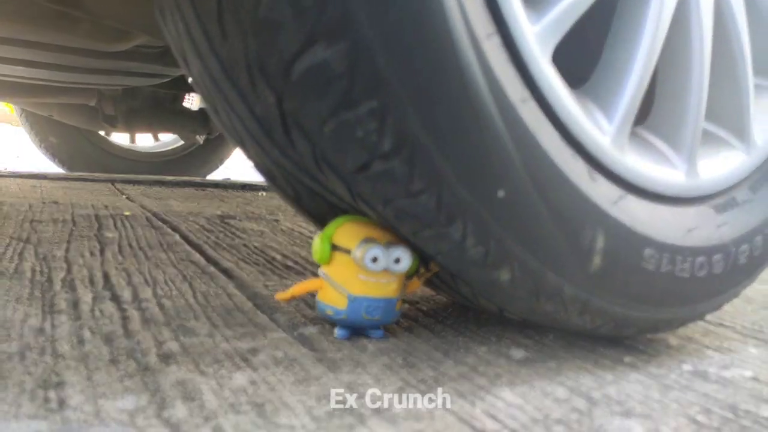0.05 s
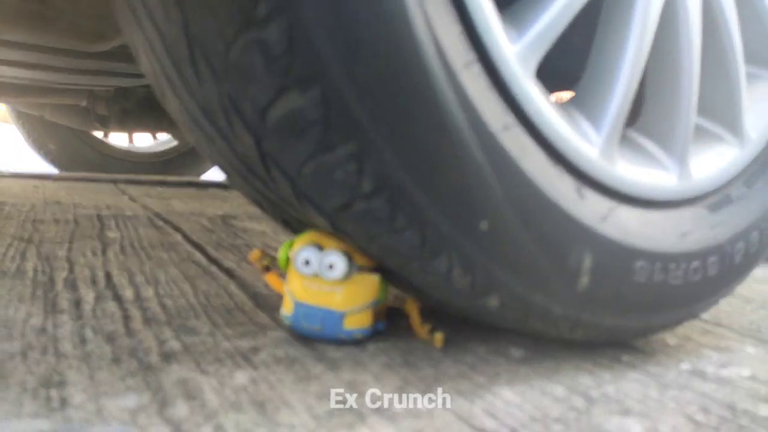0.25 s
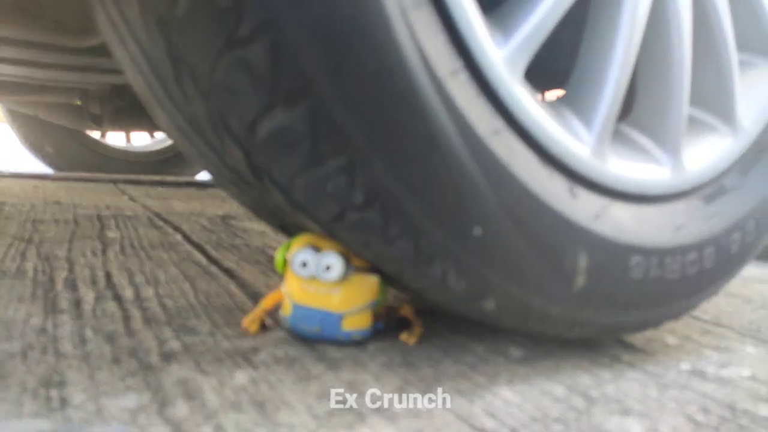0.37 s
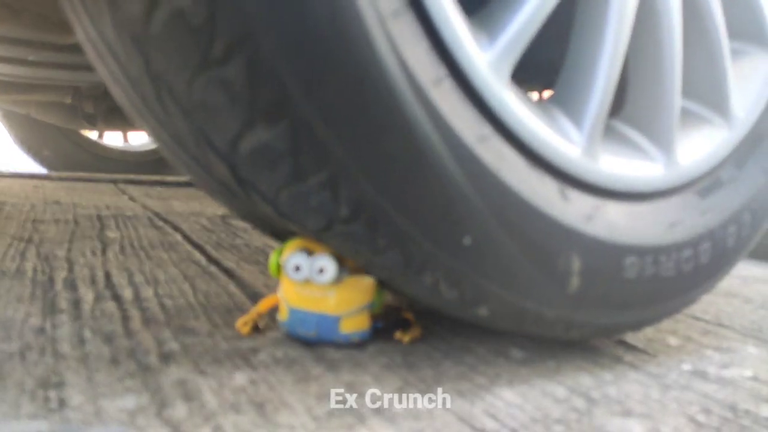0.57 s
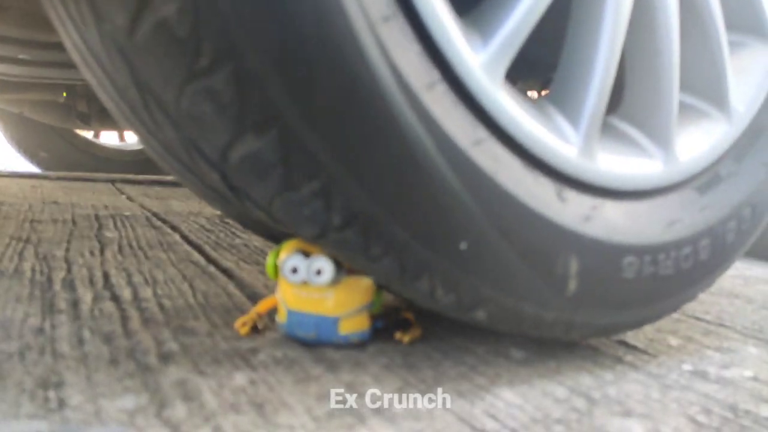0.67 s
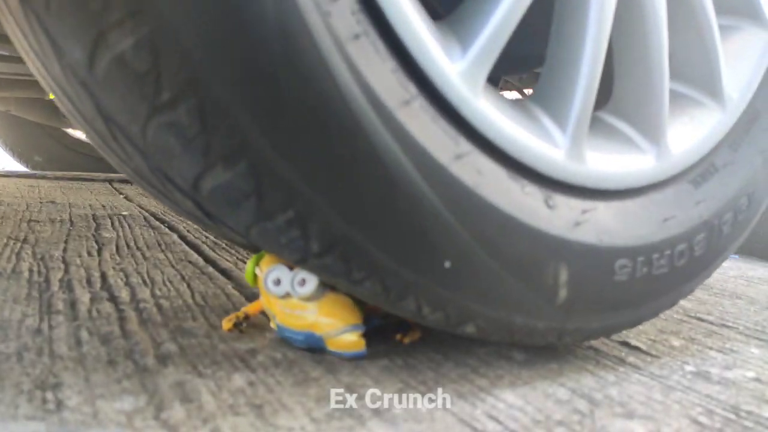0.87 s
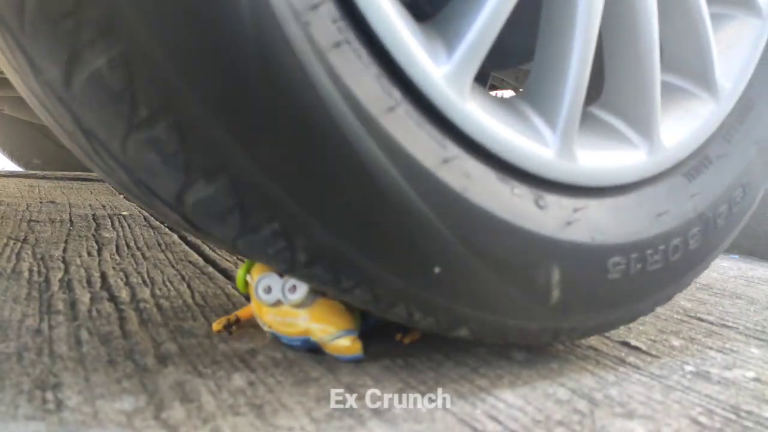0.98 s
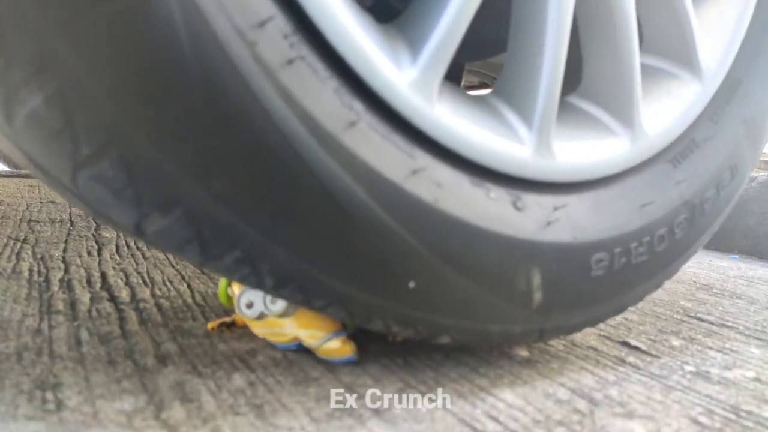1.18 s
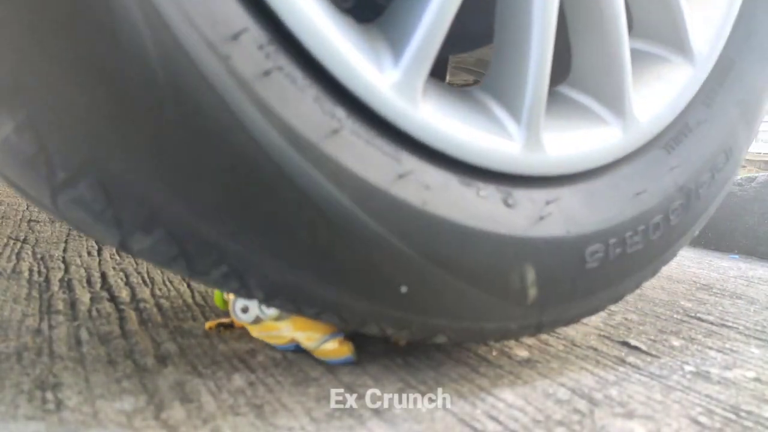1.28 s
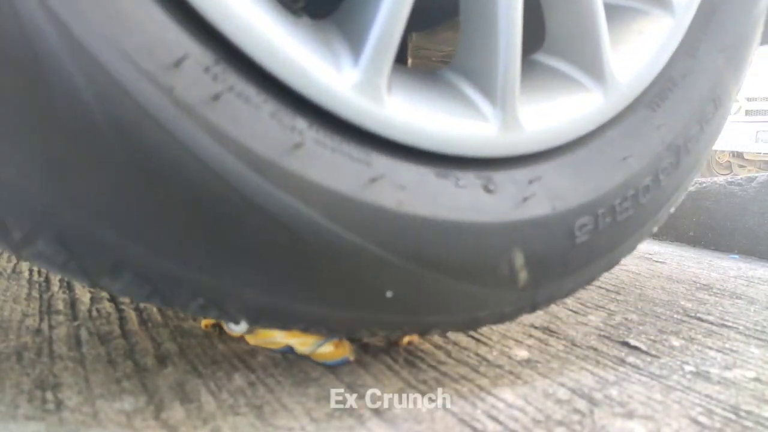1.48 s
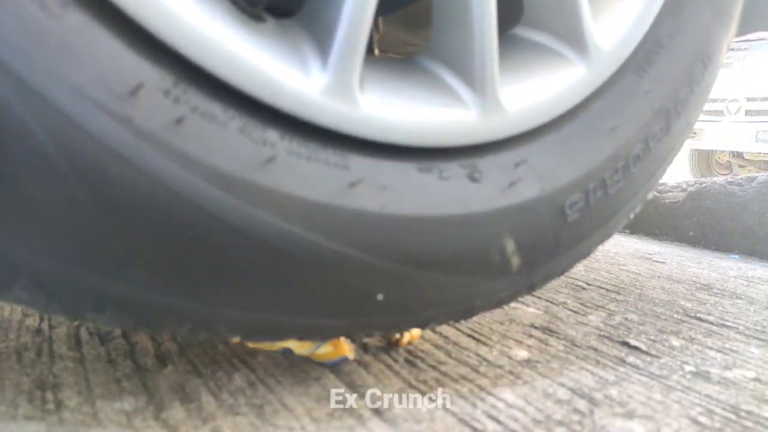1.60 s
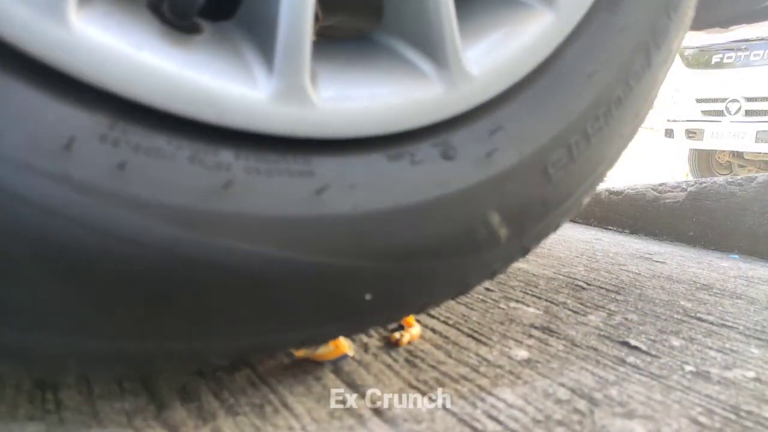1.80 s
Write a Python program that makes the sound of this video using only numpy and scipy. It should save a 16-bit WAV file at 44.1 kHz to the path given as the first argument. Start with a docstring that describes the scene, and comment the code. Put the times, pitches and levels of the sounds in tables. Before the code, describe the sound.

Hard plastic cracks and crunches in sharp snaps under a slowly rolling car tyre.

```python
"""On concrete, a hand's width from a phone, a car creeps over a hollow plastic toy.
The engine hums, a thin whine swells into one squeak, and grit crackles under the tyre.
The toy splits in sharp snaps: each cracks, rings a shard, knocks the shell and echoes under the car.
Each time the toy gives way, the tyre drops, booms and pushes air at the microphone, which overloads.
After the first drop the rubber settles with a dull rustle."""
import sys
import numpy as np
from scipy import signal
from scipy.fft import rfft, irfft
from scipy.io import wavfile
from scipy.ndimage import uniform_filter1d

SR = 44100
rng = np.random.default_rng(int(sys.argv[2]) if len(sys.argv) > 2 else 0)


def digitize_waveform(pressure):
    """Quantize a signal to 16-bit integers and store it at the path in sys.argv[1].

    Rows of a 2-D input are taken as channels; values are limited to [-1, 1].
    """
    field = np.atleast_2d(pressure).T
    bounded = np.clip(field, -1, 1)
    quanta = np.round(bounded * 32767).astype(np.int16)
    wavfile.write(sys.argv[1], SR, quanta)


N = 81585
TIME_S = np.arange(N) / SR


def gain(db):
    """Turn decibels into a number to multiply a sound by."""
    return 10 ** (np.asarray(db) / 20)


def fade(fade_s):
    """A smooth dying away that falls by 60 dB in fade_s seconds."""
    return np.exp(-np.log(1000) * TIME_S / fade_s)


def noise(colour):
    """Noise of strength 1, its lows and highs shaped by rows of (pitch_hz, level_db)."""
    hz, db = np.array(colour, float).T
    all_hz = np.maximum(np.fft.rfftfreq(N, 1 / SR), 1)
    roll_off = np.minimum(all_hz / hz[0], 1) ** 2 * np.minimum(hz[-1] / all_hz, 1) ** 2
    shape = gain(np.interp(np.log(all_hz), np.log(hz), db))
    sound = irfft(rfft(rng.standard_normal(N)) * roll_off * shape, N)
    return sound / sound.std()


def ring(tones):
    """A struck object: one fading tone for each row of (pitch_hz, level_db, fade_s)."""
    return sum(gain(db) * np.sin(2 * np.pi * hz * TIME_S) * fade(fade_s) for hz, db, fade_s in tones)


def add(out, start_s, sound):
    """Mix a sound into out at its start time."""
    start = max(int(start_s * SR), 0)
    out[start:start + len(sound)] += sound[:N - start]


def wander(turns_per_s):
    """A slow random drift around zero, roughly 1 in size."""
    step = int(SR / turns_per_s)
    targets = rng.standard_normal(N // step + 1)
    return uniform_filter1d(np.repeat(targets, step), step)[:N]


def lowpass(sound, hz):
    """Cut away the treble above hz."""
    return signal.sosfilt(signal.ellip(10, .2, 75, hz, fs=SR, output="sos"), sound)


# The tones in the engine's hum: pitch_hz, level_db
ENGINE_TONES = [(33, -50), (66.2, -21), (99.5, -48), (242, -38.5), (264, -40.5), (331, -40.5), (400, -47.5)]
# The lows and highs of the fan and street noise: pitch_hz, level_db
FAN_AND_STREET_COLOUR = [(90, -2), (170, 1), (340, -0.5), (460, -3), (750, -5), (1100, -8.5), (1600, -7.5),
                         (2500, -19.5), (4500, -21), (7500, -38), (9000, -34.5)]


def engine():
    """The engine's firing makes a slightly wavering hum, over fan and street noise and a low rumble."""
    wavering_s = TIME_S + 0.00017 * wander(3.3)
    hum = np.zeros(N)
    for hz, db in ENGINE_TONES:
        peak = gain(db - 0.5 * wander(10.1)) * np.sqrt(2)
        hum += peak * np.sin(2 * np.pi * (hz * wavering_s + rng.random()))
    rumble = gain(-25) * noise([(12, -0.5), (40, -19), (90, -21.5)])
    fan_and_street = gain(-34) * noise(FAN_AND_STREET_COLOUR) * gain(0.42 * wander(27))
    return hum + fan_and_street + rumble


def whine(pitch_hz=2005, squeak_middle_s=0.212, squeak_length_s=0.046):
    """A faint, thin whine from the car swells once into a short squeak."""
    phase = 2 * np.pi * np.cumsum(pitch_hz * (1 + 0.0021 * wander(15))) / SR
    tone = np.sin(phase) + gain(-12) * np.sin(2 * phase)
    swell = np.exp(-((TIME_S - squeak_middle_s) / (squeak_length_s / 2)) ** 6)
    return (gain(-53.5) + gain(-33.5) * swell) * tone


# The lows and highs of cracking plastic: pitch_hz, level_db
CRACK_COLOUR = [(100, -10), (400, 2.5), (900, 6.5), (1700, 4), (2400, 0), (4000, 0.5), (6000, -8),
                (7500, -7.5), (10000, -5)]


def crack_noise():
    """The bright noise of tearing plastic, from which clicks and cracks are cut."""
    return noise(CRACK_COLOUR)


# How loud the crackle under the tyre is as time passes: time_s, level_db
GRIT_LEVELS = [(0, -30), (.22, -78), (.31, -25), (.45, -36), (.72, -54), (0.952, -46), (1.2, -30.5),
               (1.5, -50), (1.85, -77)]


def grit(clicks_per_s=820, spread_db=7.5):
    """Strained plastic and grit make tiny random clicks under the tyre."""
    times_s, levels_db = np.array(GRIT_LEVELS).T
    clicks = (rng.random(N) < clicks_per_s / SR) * gain(spread_db * rng.standard_normal(N))
    crackle = signal.fftconvolve(clicks, crack_noise() * fade(0.0025))[:N]
    return crackle / crackle.std() * gain(np.interp(TIME_S, times_s, levels_db))


def shard(pitch_hz):
    """A broken piece rings briefly with one tone and a softer one just below it."""
    return ring([(pitch_hz, 0, 0.013), (pitch_hz / 1.05, -6, 0.013)])


# The tones of the toy's pinched shell when it is knocked: pitch_hz, level_db, fade_s
SHELL_TONES = [(502, -16.5, 0.035), (620, -5.5, 0.025), (764, -4, 0.032), (812, -4.5, 0.029),
               (1397, -18, .025)]
# One row for each snap of the toy; "first" and "second" are the two pitches of its shard:
# start_s, crack_db, crack_fade_s, knock_db, first_hz, first_db, second_hz, second_db
TOY_SNAPS = [ (0.1647, -11, 0.038, -44, 1910, -10.5, 3960, -11.5),
             (0.2365, 16.5, 0.051, 4, 2950, 10, 1280, 16), (0.2513, 8.5, 0.034, -11, 1280, 11, 4460, -10),
             (0.2624, 1.5, 0.045, -7, 2500, -8, 5200, -30), (0.2743, -4, 0.03, -0.5, 1400, -13, 3670, -13),
             (.2828, -10, 0.035, -18.5, 990, 1.5, 2100, -16),
             (0.2918, -11.5, 0.051, -3, 1300, -19.5, 3840, -26),
             (0.343, -15, 0.011, -34, 4800, -16, 2160, -22), (0.358, -16, 0.01, -28, 3660, -18, 3350, -29),
             (.3630, -32, .015, -26, 3680, -15.5, 4000, -23),
             (.4012, -25, .015, -35, 4600, -21, 7420, -28.5),
             (.4270, -29, .03, -18, 1570, -15.5, 1000, -13.5),
             (0.4434, -13, 0.012, -25.5, 3770, -25, 2370, -22),
             (0.4917, -26.5, .015, -45, 6000, -30.5, 2700, -33),
             (.5596, 2.5, 0.042, 6, 1800, -1, 4700, -14), (0.5848, -1, .016, -11, 2960, 2, 7050, -15),
             (0.6136, 0, 0.015, -14.5, 7100, -17, 2840, -5),
             (0.6339, -23, 0.018, -17.5, 1680, -18, 2900, -17.5),
             (0.7953, -19.5, .015, -50, 2840, -17.5, 7480, -21),
             (0.8328, -6.5, 0.017, -48, 7300, -6, 2960, -6), (0.8476, 17.5, 0.023, 10.5, 1580, 16, 4240, 3),
             (0.8684, 5, 0.021, -10, 1440, 2, 2080, -5), (.8790, -0.5, 0.015, -5, 1200, -10, 2370, -12),
             (.8930, 6, 0.017, -32, 5560, 2, 3300, -3), (0.9024, 3.5, 0.047, 6.5, 1435, 13.5, 1124, 13),
             (.9150, -1, 0.035, -7, 1130, -8, 1630, -6), (0.9454, -7.5, 0.012, -12.5, 4020, -17, 1640, -12),
             (1.0047, -6.5, .016, -3, 4880, 2.5, 3980, 2.5), (1.019, -3.5, 0.018, -5, 3730, 0, 4980, 3.5),
             (1.0331, -2, 0.046, -3.5, 3920, 9, 1810, 3.5), (1.0430, -0.5, 0.048, -7, 4950, 6, 1490, -3),
             (1.0548, 0, 0.017, -5.5, 4650, -6, 6970, -7.5),
             (1.0922, -5.5, 0.017, -10.5, 7400, -9, 1750, -11),
             (1.1499, -23.5, 0.06, -36, 1210, -13, 1000, -6),
             (1.1650, -8, 0.021, -31, 4470, -28, 2440, -19), (1.1701, 3, 0.031, 8, 2880, 10, 2650, -5),
             (1.1904, -18, 0.0087, -29, 5000, -9, 3120, -10), (1.2047, -3, 0.017, -3, 5200, -9, 2240, -11),
             (1.2390, 2, 0.0081, -2, 5190, -4, 2300, -4), (1.2731, 1, 0.0075, -0.5, 3580, -6, 2090, -7),
             (1.313, -5.5, 0.019, 3, 2960, -7, 1330, -7), (1.3460, -11.5, 0.011, -30, 3350, -23, 2180, -27),
             (1.3546, 2, 0.011, 4, 5030, 0.5, 5880, -2), (1.4493, -0.5, 0.052, 7.5, 4090, 6.5, 1620, -3),
             (1.5752, -3, 0.01, -12, 4910, -1, 5860, -2.5),
             (1.6620, -5, 0.0049, -19.5, 6070, -15.5, 4700, -16), ]


def snaps():
    """Each break tears the plastic, rings a shard and knocks the shell; all of it echoes."""
    cracks, shards, knocks = np.zeros((3, N))
    length = SR // 6
    tearing, shell = crack_noise(), ring(SHELL_TONES)
    for start_s, crack_db, crack_fade_s, knock_db, first_hz, first_db, second_hz, second_db in TOY_SNAPS:
        crack = np.roll(tearing, -rng.integers(N)) * fade(crack_fade_s)
        ringing = gain(first_db) * shard(first_hz) + gain(second_db) * shard(second_hz)
        add(cracks, start_s, gain(crack_db) * crack[:length])
        add(shards, start_s, ringing[:length])
        add(knocks, start_s, gain(knock_db) * shell[:length])
    # Only part of the ringing reaches the car's underside, and the tyre muffles the knocks.
    under_car = cracks + gain(-4) * shards + gain(-2) * knocks
    return cracks + shards + knocks + echoes(under_car)


# The lows and highs of the echo under the car: pitch_hz, level_db
ECHO_COLOUR = [(80, -6), (300, 3.5), (800, -0.5), (1500, 1.5), (3000, -5), (5000, -1.5), (7500, -1.5),
               (10000, 2.5)]


def echoes(sound, delay_s=0.0051):
    """Sound bounces quickly between wheel, underside and concrete, then leaves a faint longer tail."""
    bounces = np.zeros(N)
    for level_db, fade_s in ((-13, 0.073), (-26, 0.53)):
        tail = noise(ECHO_COLOUR) * fade(fade_s)
        add(bounces, delay_s, gain(level_db) * tail / np.linalg.norm(tail))
    return signal.fftconvolve(sound, bounces)[:N]


# The lows and highs of the rubber's thud: pitch_hz, level_db
THUD_COLOUR = [(25, -1), (70, 2), (130, 0), (190, -5.5), (330, 0), (500, -9.5), (900, -13), (2500, -25)]
# The short tones of the tyre's rubber wall: pitch_hz, level_db, fade_s
RUBBER_TONES = [(106, -9.5, 0.093), (167, -9.5, 0.12), (320.3, -3.5, .1), (485.5, -10, 0.11)]
# The longer tones of the air inside the tyre: pitch_hz, level_db, fade_s
BOOM_TONES = [(113.6, -1, 0.38), (132.9, -1, 0.34), (239.7, -4.5, 1.103), (267, -18, 1), (378, -8, .42),
              (475, -22.5, 0.5)]
# One row for each time the toy gives way: start_s, thud_db, boom_db, push_db, push_hz
TYRE_DROPS = [ (0.2379, 13.5, 2, 11.5, 14.3), (.5600, 0.5, -23.5, -40, 20), (.8490, 11.5, -22, 11, 17.7),
              (.9030, 1, -16.5, -26, 21), (1.0342, -2, -47, -7, 14), (1.1700, -3.5, -20, -19, 24),
              (1.4500, -4, -17, -10.5, 43), ]


def tyre_drops(boom_rise_s=0.014, thud_fade_s=0.12, push_fade_s=0.22):
    """The tyre drops: its rubber thuds, the air inside booms, and the air outside gets a slow push."""
    out = np.zeros(N)
    rubber_noise, rubber_ring = noise(THUD_COLOUR), ring(RUBBER_TONES)
    boom = ring(BOOM_TONES) * (1 - np.exp(-TIME_S / boom_rise_s))
    for start_s, thud_db, boom_db, push_db, push_hz in TYRE_DROPS:
        thud = rubber_ring + gain(-2) * np.roll(rubber_noise, rng.integers(N)) * fade(thud_fade_s)
        air_push = ring([(push_hz, push_db, push_fade_s)])
        add(out, start_s, gain(thud_db) * thud + gain(boom_db) * boom + air_push)
    return out


# The lows and highs of the settling rubber: pitch_hz, level_db
RUSTLE_COLOUR = [(120, 3.5), (170, 11.5), (300, 3), (600, -2.5), (1050, 2.5), (1600, -25), (3000, -29)]


def tyre_rustle():
    """After the first drop the rubber settles on the rough concrete with a dull, fading rustle."""
    out = np.zeros(N)
    first_drop_s = TYRE_DROPS[0][0]
    add(out, first_drop_s, gain(-12.5) * noise(RUSTLE_COLOUR) * fade(0.71))
    return out


def scene():
    """The breaking toy, the tyre and the engine, mixed into one channel."""
    return (snaps() + tyre_drops() + tyre_rustle() + grit() + engine() + whine())[None]


def record(dry, treble_limit_hz=7850, overload_level=0.85, drift_hz=3.9):
    """The microphone squashes loud peaks; only the fizz of that overload passes its treble limit."""
    narrow = lowpass(dry, treble_limit_hz)
    squashed = narrow / (1 + (narrow / overload_level) ** 6) ** (1 / 6)
    # The microphone cannot hold a steady pressure, so very slow swings sag back to zero.
    centred = signal.sosfilt(signal.butter(1, drift_hz, "high", fs=SR, output="sos"), squashed)
    fizz = signal.sosfilt(signal.butter(6, treble_limit_hz, "high", fs=SR, output="sos"), centred)
    treble_cut = signal.firwin(121, treble_limit_hz + 150, fs=SR, window="blackman")
    body = signal.fftconvolve(centred, treble_cut[None], "same")
    mix = gain(0.35) * body + gain(-9.5) * fizz
    overshoot = mix - np.clip(mix, -1, 1)
    return lowpass(mix - 0.86 * overshoot, hz=15900)


dry = scene()
out = record(dry)
digitize_waveform(out)
```